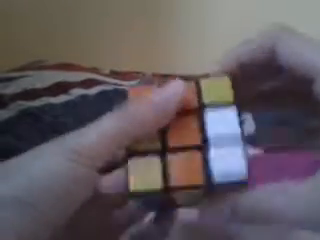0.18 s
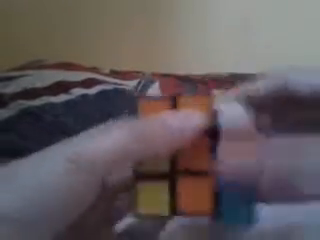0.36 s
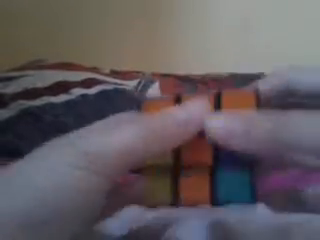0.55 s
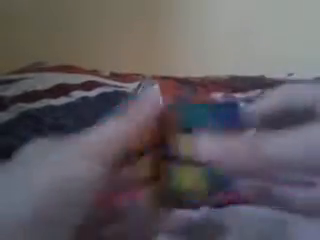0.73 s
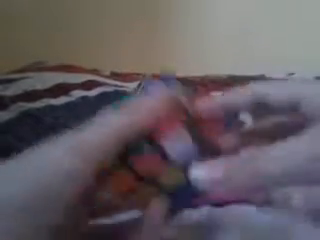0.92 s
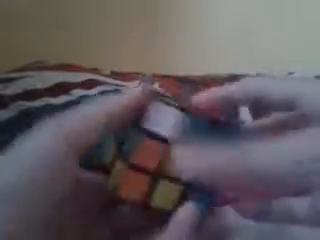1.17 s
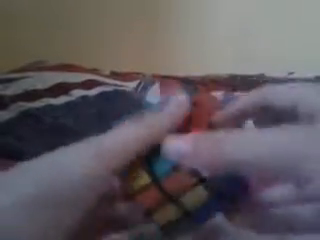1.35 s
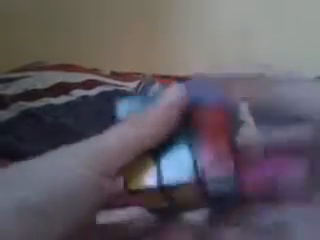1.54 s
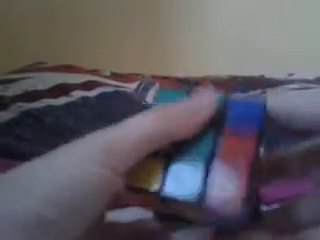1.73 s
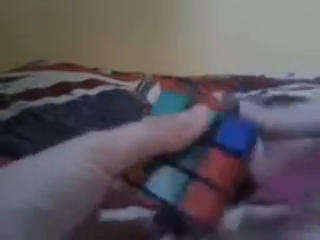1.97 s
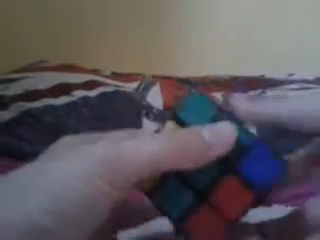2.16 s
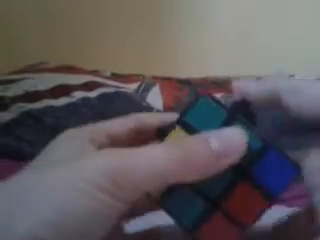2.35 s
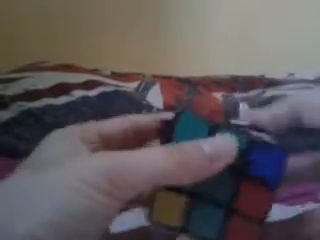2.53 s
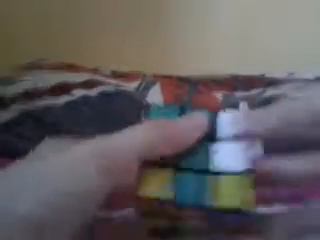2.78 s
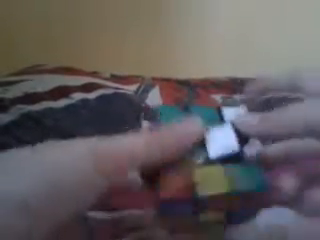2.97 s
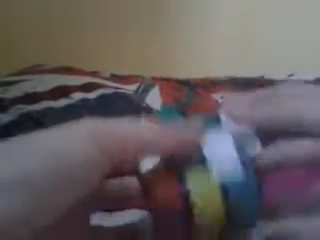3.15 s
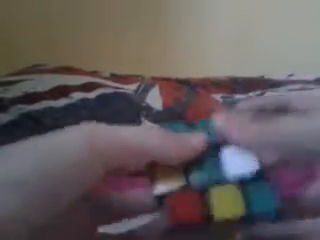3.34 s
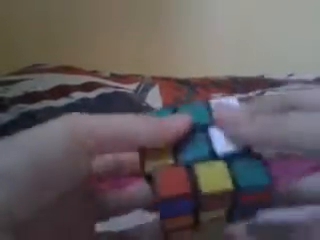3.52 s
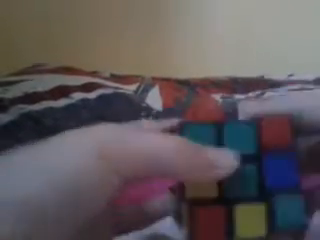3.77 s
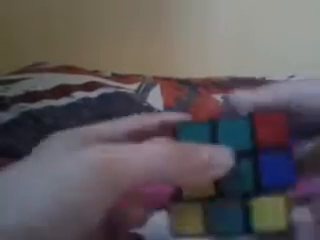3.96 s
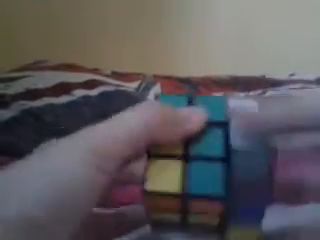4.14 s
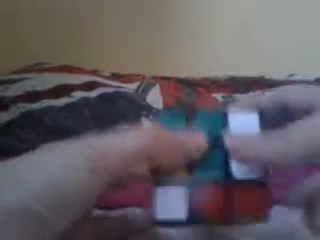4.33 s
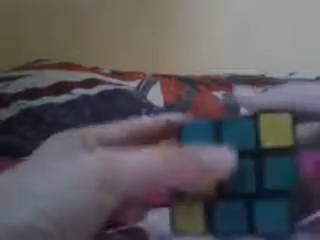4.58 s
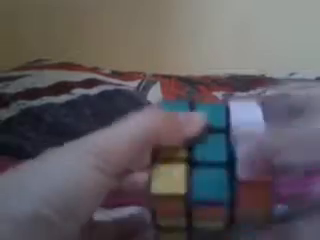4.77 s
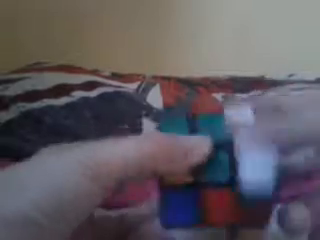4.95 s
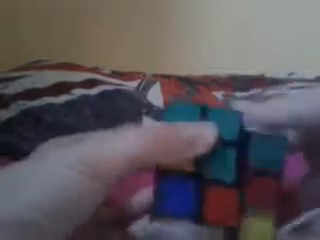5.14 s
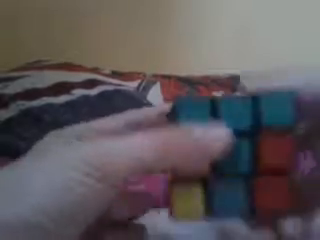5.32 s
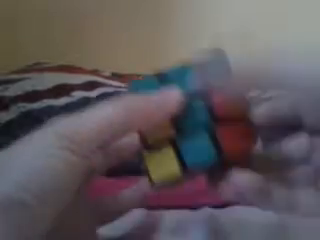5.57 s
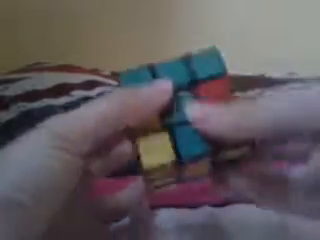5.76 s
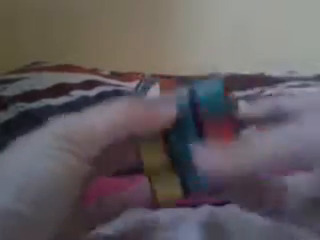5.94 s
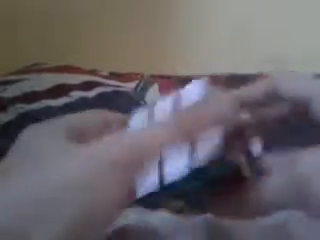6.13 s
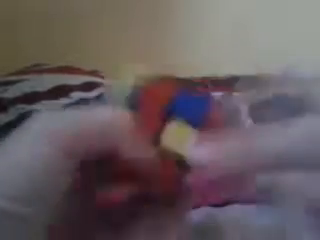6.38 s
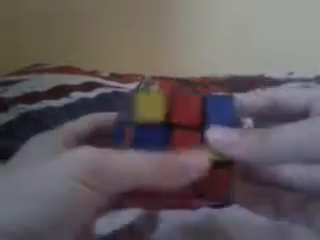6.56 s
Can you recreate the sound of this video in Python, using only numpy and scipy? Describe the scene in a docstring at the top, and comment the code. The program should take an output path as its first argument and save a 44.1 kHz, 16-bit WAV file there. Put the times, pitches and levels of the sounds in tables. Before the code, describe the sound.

Hands twist a plastic puzzle cube close to a small microphone in a furnished room. One sharp snap and scattered light ticks lead into bursts of hollow clicks and brief scrapes, which come faster and louder with short pauses between them. Near the end the turning stops and the hands rustle softly as the grip shifts, with a few faint ticks. A faint hiss runs throughout.

```python
"""Light plastic ticks and one sharp snap, then quickening flurries: a puzzle cube twisted by hand,
close to a small microphone in a furnished room. Pieces tick and scrape past each other, then each
layer snaps home and rings the hollow cube. Near the end the hands shift their grip in a pause.
Faint hiss lies behind it all; the narrow-band recorder overloads on the hardest snaps."""
import sys
import numpy as np
from scipy import signal
from scipy.fft import rfft, irfft
from scipy.io import wavfile
from scipy.ndimage import uniform_filter1d, minimum_filter1d

SR = 44100
rng = np.random.default_rng(int(sys.argv[2]) if len(sys.argv) > 2 else 0)


def put_to_file(sound):
    """Save the sound as 16-bit audio at rate SR, in the file named by the first command-line argument."""
    columns = np.atleast_2d(sound).T  # one column per channel
    safe = np.clip(columns, -1, 1)
    whole_steps = np.round(safe * 32767)
    wavfile.write(sys.argv[1], SR, whole_steps.astype(np.int16))


N = 291048
BAND_HZ = 7092  # upper edge of the recorder's narrow band
HIT_S = .003  # a hit's level is its rms with all the energy packed into this time


# Pieces colliding, close to the microphone: t/s, level/dB, body/dB, brightness/dB
COLLISIONS = [(.052, -42, 1, 3), (.0959, -41, 10, 2.5), (0.1777, -16, -3.5, 3.5), (0.2218, -42.5, 15, -2),
              (.3397, -35, -1.5, -2), (.3819, -35, -8.5, -2), (.486, -46, -5, 8), (.508, -35.5, -26, -11.5),
              (0.6301, -36, -19, -6), (0.6608, -43, -24, 8), (0.689, -32.5, -2.5, 1),
              (0.7017, -43, -14, -2), (1.1415, -44, 6.5, 0.5), (1.312, -44.5, 8, 0), (1.4737, -42.5, -1, 3),
              (1.5419, -35, -3, -4), (1.5689, -28, -4, -2), (1.5813, -24, 0.5, 9.5), (1.64, -29, 1, 8),
              (1.6521, -22, 4, 12), (1.6595, -8, -8, 3), (1.753, -40.5, 6.5, 2), (1.779, -33, -1, -2),
              (1.91, -35, -7, 1), (2.1053, -37.5, -6.5, -1), (2.2122, -44, -4, 1), (2.273, -41.5, 8.5, 4),
              (2.342, -33, -1, 4), (2.4235, -40, 6.5, 3), (2.4516, -22, -3, 3), (2.4548, -20.5, 5.5, 7.5),
              (2.4714, -27, 8, 13.5), (2.4853, -17, -8.5, 1), (2.528, -33.5, 8, 2.5), (2.6088, -34, 8.5, 8),
              (2.6237, -34, 2, 4), (2.6491, -32.5, 1, 3), (2.686, -30.5, 2, 9), (2.712, -36, 0, 4),
              (2.75, -18.5, -6, 2.5), (2.7682, 1, 2, 13.5), (2.7732, -12.5, -6, 5), (2.7852, -10, -12, 1.5),
              (2.942, -42.5, 9, 2), (3.037, -44.5, 0, 0), (3.1192, -39, -11, -5), (3.159, -44, 2, -9),
              (3.187, -45, -7, -13), (3.3291, -42, -2.5, -18), (3.429, -47.5, 7, -1), (3.4663, -36, 3, 0.5),
              (3.4969, -22, -3, 11.5), (3.5246, -26, 8, 9), (3.5294, -21.5, 0, 7), (3.5505, -24, -1, 1),
              (3.5629, -21, -3.5, 6), (3.63, -39, -2, -5), (3.7212, -26, -10, 1),
              (3.7381, -14.5, -4.5, 0.5), (3.7481, -8.5, -3, 8), (3.781, -29, -16, -1),
              (3.876, -28.5, -2.5, -1.5), (3.9353, -10.5, -2, 7), (3.9415, -12.5, -6, 3),
              (4.0165, -40, 2, 0), (4.051, -35.5, 3, -5), (4.1064, -26, 0, 13), (4.1186, -11, -18, 0),
              (4.1227, -4, -2.5, 9.5), (4.13, -10, -10, -5), (4.1817, -32.5, 7, 14), (4.218, -40, -5, 5),
              (4.241, -15.5, -4.5, 5.5), (4.244, -12.5, -2, 18), (4.278, -23, 0, 8),
              (4.294, -15.5, -6.5, 4), (4.328, -24.5, -5.5, 4), (4.3433, -15, -3, 6.5), (4.346, -11, 2, 15),
              (4.3558, -15.5, -1.5, 17), (4.4246, -36, 4, 3), (4.444, -29, -2.5, -2),
              (4.468, -31.5, -4.5, -3), (4.5062, -22, 4, 13.5), (4.5133, -22.5, -14, -4),
              (4.5191, -18.5, -1, 10), (4.537, -17.5, -9, -11.5), (4.594, -35, -1.5, 7), (4.633, -33, 4, 4),
              (4.6615, -17.5, -14, 16), (4.678, -5, 3, 20), (4.683, 1, -3, 10), (4.6917, -12, -6, 12),
              (4.696, -18, -14, 5), (4.7943, -20, -16, -4.5), (4.97, -37, -8, -2), (4.9953, -27, -22, -18),
              (5, -18.5, -0.5, 1.5), (5.0447, -23.5, -5, -4), (5.0548, -17, -1.5, 4),
              (5.0687, -10.5, -7, 2.5), (5.0793, -9.5, -4.5, 8.5), (5.0828, -11, -11, 5.5),
              (5.0899, -17, -18, -0.5), (5.3103, -39, 4.5, 5.5), (5.4335, -41.5, 0.5, 4),
              (5.4927, -33, 0, 5.5), (5.624, -38, -14.5, -14.5), (5.9888, -38, 3.5, 1),
              (6.238, -31, -5, -1.5), (6.28, -36.5, 1, 10), (6.383, -49, -8, -20.5), (6.5165, -38, -5, 5.5)]

def clicks(lead_s=.008, chatter_s=.0007, medium_db=-30, size=2048):
    """Pieces scrape for a moment, collide and chatter; each collision rings a slightly different piece."""
    t = np.arange(size) / SR - lead_s
    hz = np.fft.rfftfreq(size, 1 / SR)
    impact = round(lead_s * SR)
    body_band = 1 / (1 + (hz / 2100) ** 6)
    bright_band = 1 - 1 / (1 + (hz / 4400) ** 10)
    scrape = .11 * np.exp(-abs(t) / .0025)
    fade = np.hanning(2 * size)[size:]
    fade /= fade[impact]
    out = np.zeros(N)
    for s, db, body_db, bright_db in COLLISIONS:
        # harder blows chatter for longer
        age = np.maximum(t, 0) / (chatter_s * np.exp(.018 * (db - medium_db)))
        contacts = rng.standard_normal(size) * (scrape + age * np.exp(1 - age))
        contacts[impact] += 2  # the first hard contact
        force = rfft(contacts)
        # chatter ripples the spectrum without tilting it
        tilt = np.sqrt(uniform_filter1d(abs(force) ** 2, size=70))
        tone = amp(body_db * body_band + bright_db * bright_band)
        ring = force * causal(hollow_piece(hz, pitch_spread=.023) / tilt * tone)
        energy = 2 * np.sum(abs(ring[hz < BAND_HZ]) ** 2) / size
        add(out, s - lead_s, amp(db) * fade * irfft(ring) * np.sqrt(HIT_S * SR / energy))
    return out


# The dry crack of plastic on plastic: f/Hz, relative level/dB
CRACK_SPECTRUM = [(40, -48.5), (200, -34), (330, -20.5), (460, -9.5), (650, -8), (1100, -1), (2200, -5),
                  (4300, -6), (7200, -3.5)]
# Ringing of the hollow pieces: f/Hz, width/Hz, level over the crack/dB
PIECE_MODES = [(540, 33, 3), (1690, 470, 1), (2863, 396, 10), (5614, 180, 8), (6820, 240, -0.5)]

def hollow_piece(hz, pitch_spread, uneven_db=2):
    """Gain of one piece: a broad crack plus modes whose pitch and strength vary from strike to strike."""
    power = np.ones(len(hz))
    chance = np.clip(rng.standard_normal((len(PIECE_MODES), 2)), -2, 2)
    for (mode_hz, width_hz, db), (shift, strength) in zip(PIECE_MODES, chance):
        offset_hz = hz - mode_hz * (1 + pitch_spread * shift)
        power += amp(db + uneven_db * strength) ** 2 / (1 + (2 * offset_hz / width_hz) ** 2)
    return amp(at_hz(CRACK_SPECTRUM, hz)) * np.sqrt(power)


# Layers turning, face sliding on face: t/s, length/s, relative level/dB
LAYER_TURNS = [(0.093, 0.12, -54.5), (0.155, 0.065, -48.5), (0.636, 0.064, -68), (1.301, 0.012, -53.5),
               (1.542, 0.027, -44.5), (1.656, 0.0098, -34.5), (2.198, 0.1, -63), (2.457, 0.061, -48),
               (2.616, 0.033, -43.5), (2.757, 0.044, -38.5), (3.334, 0.016, -55), (3.505, 0.041, -35),
               (3.723, 0.012, -38), (3.857, 0.12, -45), (4.062, .11, -41), (4.219, 0.14, -37.5),
               (4.497, 0.044, -31.5), (4.663, 0.037, -28), (4.757, 0.047, -43.5), (4.955, 0.046, -48),
               (5.055, 0.018, -33), (5.476, 0.017, -49), (6.235, 0.064, -60)]

def sliding(attack_db_per_s=800.5, release_db_per_s=400.5, slope_db=-.5, creep_db=-68):
    """Faces scrape and corners catch as a layer turns; between turns the faces creep faintly."""
    t = np.arange(N) / SR
    power = np.zeros(N)
    for start, length, db in LAYER_TURNS:
        attack_db = attack_db_per_s * np.maximum(start - t, 0)
        release_db = release_db_per_s * np.maximum(t - start - length, 0)
        progress = np.clip((t - start) / length, 0, 1)
        turn_db = db + slope_db * (progress - .5) - attack_db - release_db
        power += amp(np.maximum(turn_db, -150)) ** 2
    friction = np.sqrt(power)
    scrape = (amp(-2) * friction + amp(creep_db)) * rattle(per_s=700, uneven_db=7)
    catches = amp(-6) * friction * rattle(per_s=85, uneven_db=1.5)
    return scrape + catches


def rattle(per_s, uneven_db, pieces=6, size=2048):
    """Random tiny catches of uneven strength, shared among several pieces; rms 1."""
    caught = rng.random(N) < per_s / SR
    strength = amp(uneven_db * np.minimum(rng.exponential(1, N), 2.5))
    catches = caught * strength * rng.choice([-1, 1], N)
    piece = rng.integers(0, pieces, N)
    hz = np.fft.rfftfreq(size, 1 / SR)
    out = np.zeros(N)
    for k in range(pieces):
        gain = hollow_piece(hz, pitch_spread=.029) / (1 + (hz / BAND_HZ) ** 20)
        out += signal.oaconvolve(catches * (piece == k), irfft(causal(gain)))[:N]
    return unit_rms(out)


# How hard the fingers jostle the cube: t/s, relative level/dB
JOSTLING = [(0, 4.5), (.65, 8), (.85, -24), (1.4, -5.5), (2.7, 1.5), (3.2, 5), (4.5, 13), (5.2, -4.5),
            (6.6, -2)]

def loose_pieces():
    """Loose pieces tick faintly as the fingers jostle them."""
    return amp(-63) * envelope(JOSTLING) * rattle(per_s=28, uneven_db=6)


# Short dull thuds under the hardest, overloading snaps and as the grip shifts: t/s, level/dB
LOW_THUDS = [(0.686, -58), (1.659, -44), (1.717, -51.5), (2.772, -41), (3.741, -50), (4.121, -46),
             (4.6797, -33), (5.836, -49.5), (5.933, -53.5), (6.237, -52), (6.279, -57)]
# Their dull tone: f/Hz, relative level/dB
THUD_SPECTRUM = [(25, -9), (60, 2), (110, -11), (190, -4), (330, -0.5), (600, -9), (2000, -39.5),
                 (7000, -64)]

def thuds(size=4096):
    """Each thud is one short low pulse with no ring."""
    hz = np.fft.rfftfreq(size, 1 / SR)
    pulse = irfft(causal(amp(at_hz(THUD_SPECTRUM, hz))))
    pulse *= np.sqrt(HIT_S * SR / np.sum(pulse ** 2))
    out = np.zeros(N)
    for s, db in LOW_THUDS:
        add(out, s, amp(db) * pulse)
    return out


# Hands and sleeves moving near the microphone: t/s, level/dB
GRIP_LEVEL = [(0, -77.5), (5.35, -69), (5.5, -56), (5.65, -57), (5.85, -57.5), (6.0, -60), (6.3, -84),
              (6.6, -92)]
# Their soft rustle: f/Hz, relative level/dB
RUSTLE_SPECTRUM = [(20, 5), (65, -9.5), (100, -20.5), (160, -24.5), (300, -11.5), (600, -8.5),
                   (1100, -16.5), (2500, -29.5), (7000, -49.5)]

def grip_rustle():
    """Hands and sleeves rub softly as the grip shifts."""
    return envelope(GRIP_LEVEL) * noise(RUSTLE_SPECTRUM)


def room(sound, patterns=4):
    """The cube moves in the hands, so its echoes drift through several patterns, once round a second."""
    t = np.arange(N) / SR
    out = np.zeros(N)
    for k in range(patterns):
        share = np.maximum(np.cos(2 * np.pi * (t - k / patterns)), 0)
        out += signal.oaconvolve(sound * share, echoes())[:N]
    return out


# The furnished room around the microphone: f/Hz, reverberation time/s
ROOM_DECAY = [(200, 0.097), (1000, 0.15), (3000, 0.13), (7000, 0.14)]

def echoes(tail_db=-15, near_db=-19, first_s=.0026, near_decay_s=.0039, per_s=3000, size=16384):
    """Quick scatter from hands and bedding close by, then a short tail from the walls."""
    t = np.arange(size) / SR
    arrivals = rng.standard_normal((2, size)) * (rng.random((2, size)) < per_s / SR)
    walls, near = arrivals * (t > first_s)
    hz, when, spectra = signal.stft(walls, SR, nperseg=256)
    decay = amp(-60 * when / at_hz(ROOM_DECAY, hz)[:, None])
    tail = signal.istft(spectra * decay, SR, nperseg=256)[1][:size]
    near *= np.exp(-t / near_decay_s)
    return amp(tail_db) * tail / np.linalg.norm(tail) + amp(near_db) * near / np.linalg.norm(near)


# Room tone and the microphone's own noise: f/Hz, relative level/dB
HISS_SPECTRUM = [(20, 21), (45, -5), (65, -11.5), (105, -29), (170, -4), (400, 4.5), (650, 4.5),
                 (1100, 1.5), (2000, -1), (4400, -4.5), (6000, -5.5), (7200, -5.5)]

def hiss(level_db=-58):
    """Room air and microphone hiss, steady behind the cube."""
    return amp(level_db) * noise(HISS_SPECTRUM)


def amp(db):
    """Decibels to gain."""
    return 10 ** (np.asarray(db) / 20)


def unit_rms(x):
    """Scales to an rms of 1."""
    return x / np.sqrt(np.mean(x ** 2) + 1e-20)


def at_hz(points, hz):
    """Interpolates a table on a log-frequency axis."""
    f, value = np.transpose(points)
    return np.interp(np.log(hz + 1), np.log(f + 1), value)


def envelope(curve):
    """A curve of t/s, level/dB as a gain for every sample."""
    return amp(np.interp(np.arange(N) / SR, *np.transpose(curve)))


def add(mix, s, sound):
    """Adds a sound to the mix at s seconds."""
    part = mix[max(round(s * SR), 0):][:len(sound)]
    part += sound[:len(part)]


def causal(gain):
    """The minimum-phase response with this gain: sharp start, then ringing."""
    log_gain = np.log(np.maximum(gain, 1e-5))
    mirrored = np.concatenate([log_gain, log_gain[-2:0:-1]])
    return np.exp(np.conj(signal.hilbert(mirrored)))[:len(gain)]


def noise(spectrum):
    """Steady noise of rms 1 with a given colour."""
    colour = amp(at_hz(spectrum, np.fft.rfftfreq(N, 1 / SR)))
    return unit_rms(irfft(rfft(rng.standard_normal(N)) * colour, N))


def scene():
    """At one microphone: the cube and hands close up, the room and hiss behind."""
    direct = clicks() + sliding() + loose_pieces() + thuds()
    return (direct + room(direct) + grip_rustle() + hiss())[None]


def limiter(x, ceiling=.93, size=25):
    """Pulls the gain down for about a millisecond around any peak over the ceiling."""
    gain = np.minimum(1, ceiling / (abs(x) + 1e-9))
    return x * uniform_filter1d(minimum_filter1d(gain, size), size)


def record(dry, clip_at=.76, top_hz=16300):
    """A narrow band with a faint leak above, a fast limiter, and clipping that splashes treble on snaps."""
    hz = np.fft.rfftfreq(N, 1 / SR)
    band = 1 / np.sqrt(1 + (hz / BAND_HZ) ** 110)
    leak = amp(-42) / (1 + (hz / 9300) ** 60)
    narrow = irfft(rfft(dry) * (band + leak), N)
    clipped = np.clip(limiter(narrow), -clip_at, clip_at)
    lowpass = signal.firwin(255, top_hz, window=("kaiser", 9), fs=SR)
    return signal.oaconvolve(clipped, lowpass[None], "same")


dry = scene()
out = record(dry)
put_to_file(out)
```